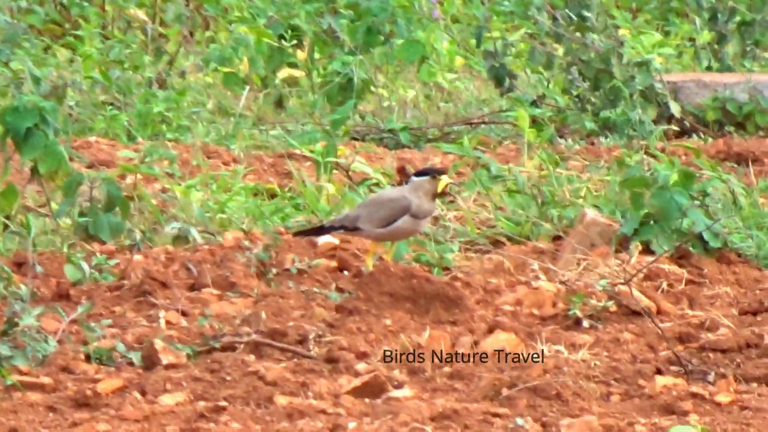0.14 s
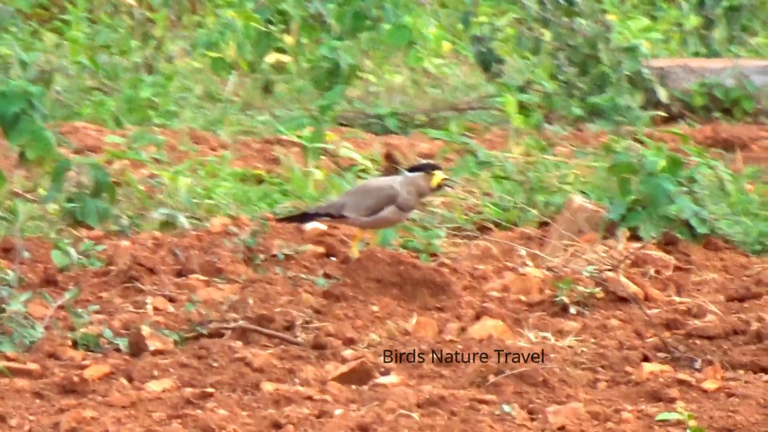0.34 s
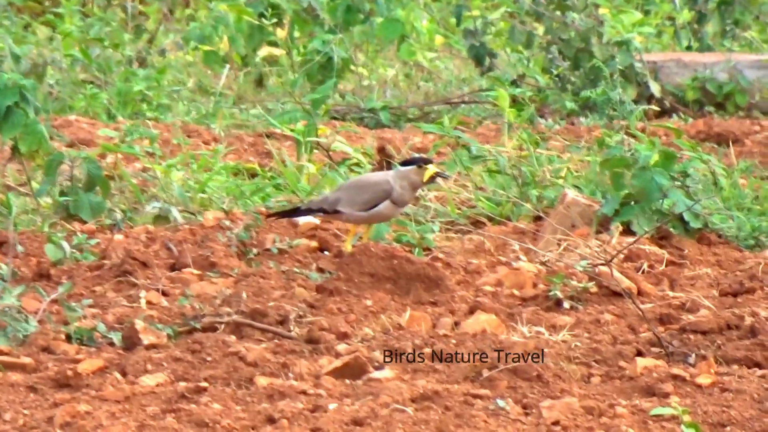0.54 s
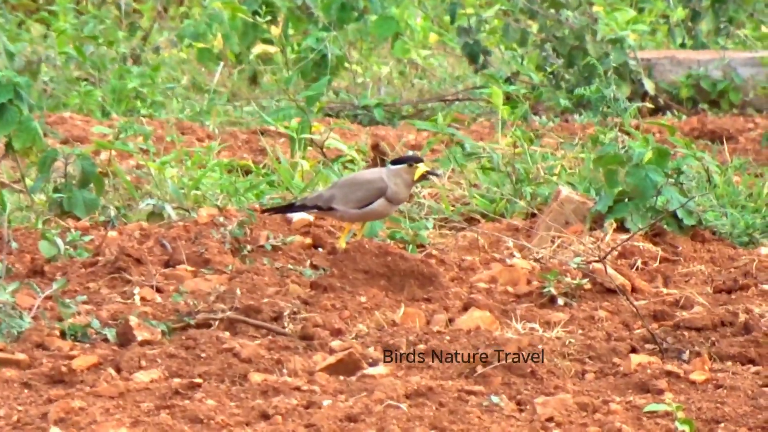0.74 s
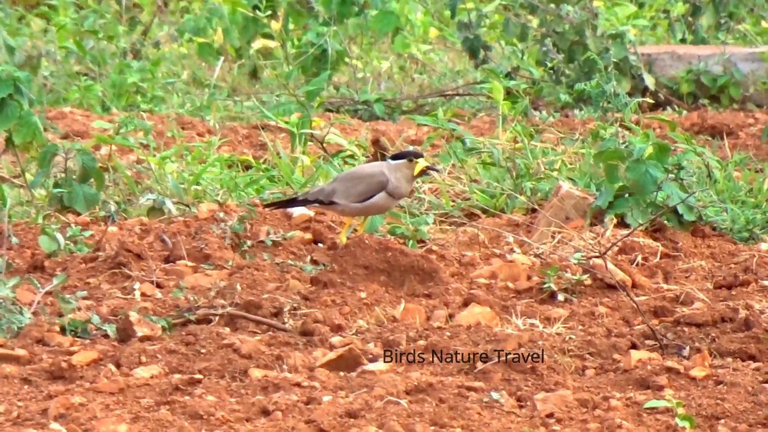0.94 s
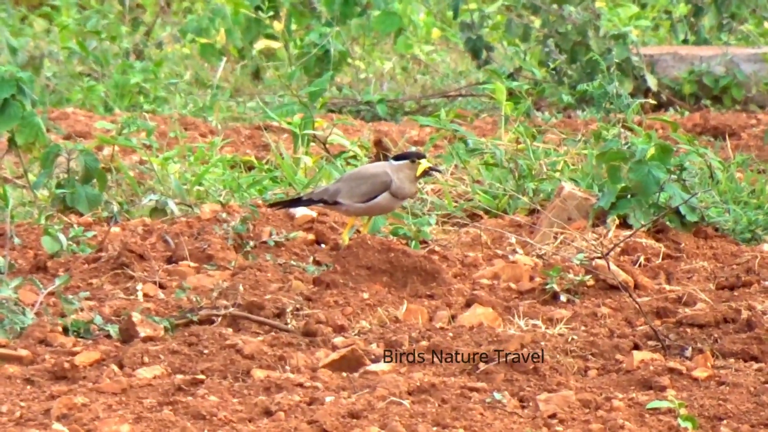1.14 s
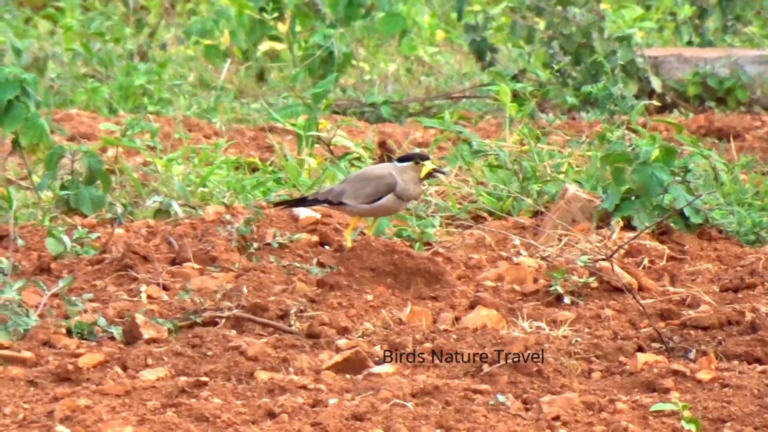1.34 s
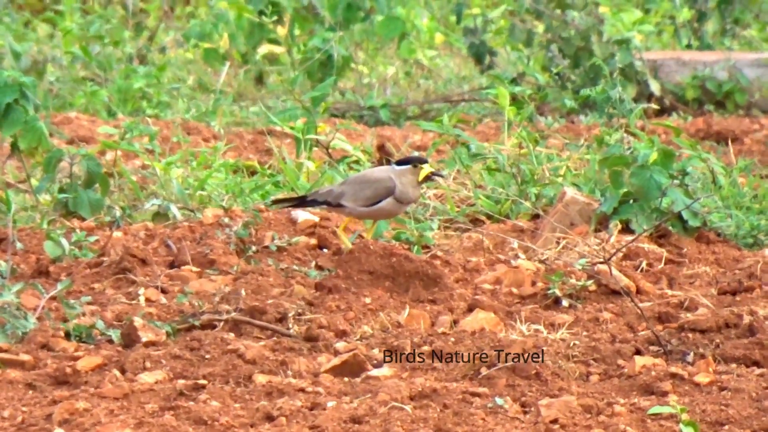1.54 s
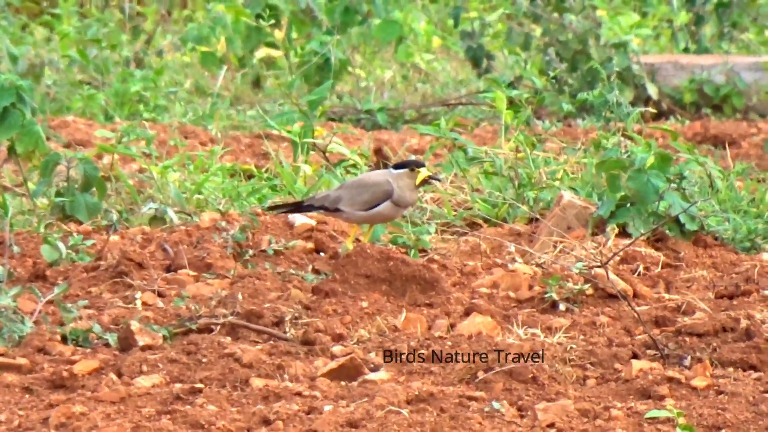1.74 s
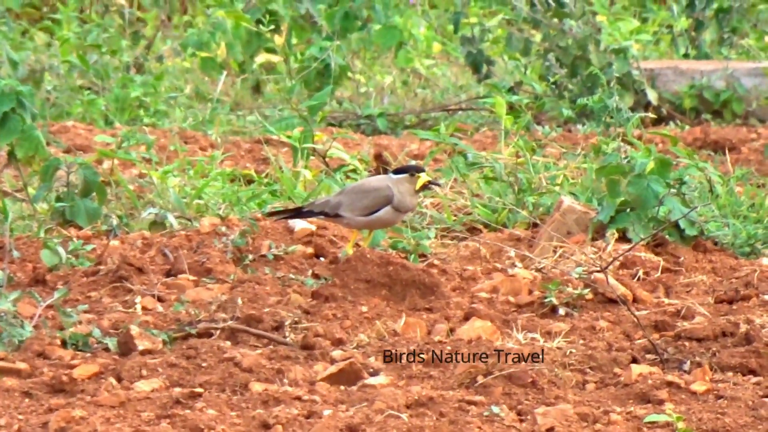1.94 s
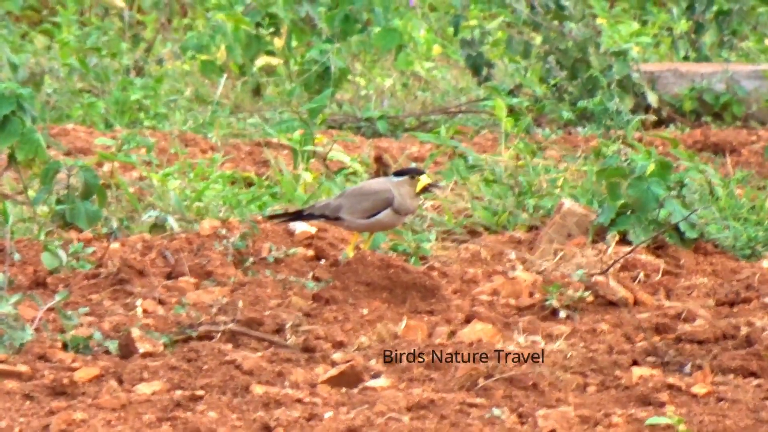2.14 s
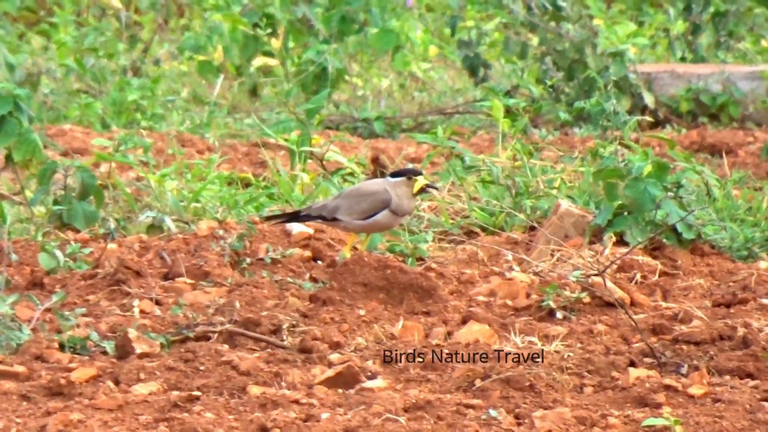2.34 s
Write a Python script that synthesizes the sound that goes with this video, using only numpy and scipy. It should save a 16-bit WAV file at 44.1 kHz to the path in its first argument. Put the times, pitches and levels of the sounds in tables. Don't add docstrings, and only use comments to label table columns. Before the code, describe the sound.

One bright, sharp bird whistle drops into a fluttering trill early on, echoing faintly off bushes. Afterwards come field hush, low hum, far traffic swells, sparse chirps and a late stone knock, through a small stereo microphone.

```python
import sys
import numpy as np
from scipy import signal
from scipy.fft import rfft, irfft
from scipy.io import wavfile
from scipy.ndimage import uniform_filter1d

SR = 44100
rng = np.random.default_rng(int(sys.argv[2]) if len(sys.argv) > 2 else 0)


def bounce(signal):
    frames = np.transpose(np.atleast_2d(signal))
    limited = np.clip(frames, -1, 1)
    pcm = np.round(limited * 32767).astype(np.int16)
    wavfile.write(sys.argv[1], SR, pcm)


def ratio(d):
    e = np.asarray(d, float) / 20
    return 10 ** e


N = 110250
T = np.arange(N) / SR


def at(hz, points):
    p = np.array(points, float)
    return np.interp(np.log(np.maximum(hz, 1)), np.log(p[:, 0]), p[:, 1])


def unit(x):
    return x / np.sqrt(np.mean(x ** 2))


def band(hz, width_hz):
    f = np.fft.rfftfreq(N, 1 / SR)
    bell = np.exp(-((f - hz) / width_hz) ** 2)
    return unit(irfft(rfft(rng.standard_normal(N)) * bell, N))


def walk(rate):
    hold = int(SR / rate)
    steps = np.repeat(rng.standard_normal(N // hold + 1), hold)
    return 1.194 * uniform_filter1d(uniform_filter1d(steps, hold), hold)[:N]


def ramp(start, length):
    return np.sin(np.pi / 2 * np.clip((T - start) / length, 0, 1)) ** 2


def pan(x, db):
    return np.array([x * ratio(db / 2), x * ratio(-db / 2)])


def fade(u, t60):
    return np.exp(-np.log(1000) * u / t60)


def field():
    # frequency in Hz, level in dB per Hz.
    colour = [(30, -114), (130, -98.5), (300, -82.5), (650, -74), (1100, -79), (2000, -86), (4500, -93),
              (11000, -105)]
    # frequency in Hz, side over mid in dB.
    side_db = [(60, -16), (300, -11.5), (620, -7.5), (1110, -4), (2000, -1), (6000, 1)]
    # frequency in Hz, left over right in dB.
    lean_db = [(100, 0.5), (350, -1), (620, -3), (2000, -5), (3500, 1), (11000, -1.5)]
    f = np.fft.rfftfreq(N, 1 / SR)
    mid, side = rfft(rng.standard_normal((2, N))) * ratio(at(f, colour))
    side = side * ratio(at(f, side_db))
    both = np.array([mid + side, mid - side]) * pan(np.ones(len(f)), at(f, lean_db))
    place = 3 * np.log2(np.maximum(f, 1) / 20)
    swell = walk(1.5)
    out = 0
    for k in range(31):
        share = np.cos(np.pi / 2 * np.clip(place - k, -1, 1)) ** 2
        out = out + irfft(both * share, N) * ratio(.25 * swell + .9 * walk(9.24))
    return out * ratio(-61.5) / np.sqrt(np.mean(out.mean(axis=0) ** 2))


def murmur():
    # centre in Hz, width in Hz, level in dB.
    blurs = [(1560, 345, -70), (3420, 230, -77), (3990, 1000, -79.5)]
    out = 0
    for hz, width_hz, db in blurs:
        out = out + np.array([band(hz, width_hz), band(hz, width_hz)]) * ratio(db + 2.0 * walk(7.5))
    return out


def pump():
    hum_hz = 394
    drift = 2.865 * walk(5.97)
    tone = np.sqrt(2) * np.sin(2 * np.pi * np.cumsum(hum_hz + drift) / SR) * ratio(-71.5)
    hum = tone + band(hum_hz, 18) * ratio(-75)
    return pan(hum * ratio(1.0 * walk(5.16)), -1.8)


def traffic():
    # start in seconds, length in seconds, centre in Hz, level in dB.
    swells = [
        (0.292, 0.14, 676, -63.5),
        (0.672, 0.15, 696, -75),
        (1.42, 0.28, 702, -61),
        (1.653, 0.2, 620, -62.5),
        (1.894, 0.17, 670, -64),
    ]
    out = 0
    for s, length, hz, db in swells:
        arch = np.sin(np.pi * np.clip((T - s) / length, 0, 1))
        out = out + band(hz, 140) * ratio(db) * arch
    return pan(out, -4.0)


def chirps():
    # start in seconds, length in seconds, from Hz, to Hz, level in dB.
    early = [(0.274, 0.043, 3600, 4030, -67.5), (0.301, 0.053, 4040, 3990, -62),
             (.355, 0.042, 3980, 3700, -64), (0.134, .035, 3930, 3960, -72), (.165, 0.043, 4140, 4270, -70),
             (0.613, 0.069, 5840, 5980, -65), (0.68, 0.045, 6850, 6140, -66.5),
             (0.719, 0.032, 6150, 6300, -72), (0.734, 0.061, 6320, 5280, -61.5),
             (0.789, 0.031, 5350, 4620, -59), (0.818, 0.016, 4820, 4350, -69),
             (0.748, 0.011, 5400, 4550, -59), (0.808, 0.022, 3660, 3970, -65),
             (0.826, 0.033, 3900, 3890, -63), (0.853, 0.088, 3890, 3630, -63),
             (0.864, 0.011, 3320, 3300, -61), (0.914, 0.014, 2570, 2500, -61),
             (0.925, 0.012, 2390, 2560, -55), (0.937, 0.011, 2600, 2590, -55.5),
             (0.944, 0.014, 2970, 3320, -57), (0.95, 0.027, 3330, 3340, -57.5),
             (0.964, 0.048, 3230, 3310, -73)]
    # start in seconds, length in seconds, from Hz, to Hz, level in dB.
    late = [(1.236, .14, 2145, 1970, -64.5), (1.715, 0.06, 4000, 3990, -67.5),
            (1.78, 0.041, 3980, 3990, -66), (1.818, 0.011, 3980, 3900, -59.5),
            (1.78, 0.016, 3080, 3220, -66), (1.798, 0.017, 3320, 3350, -63),
            (1.823, 0.0088, 3380, 3230, -64), (1.902, .04, 3930, 3980, -72),
            (2.092, 0.013, 4400, 3760, -65), (2.113, 0.016, 4420, 3950, -64),
            (2.134, 0.022, 3850, 4350, -56.5), (2.164, 0.053, 4900, 5560, -72),
            (2.248, 0.033, 3400, 3280, -67), (2.362, 0.0063, 4300, 4150, -66),
            (2.409, 0.0075, 3670, 4100, -63), (2.428, 0.012, 4630, 3930, -61),
            (2.436, .011, 4150, 4550, -65), (2.451, 0.014, 3970, 4180, -56.5),
            (2.461, 0.015, 4270, 4300, -63), (2.485, .008, 4220, 4400, -64),
            (2.483, 0.015, 4950, 5250, -69)]
    grain, wobble = walk(260), walk(130)
    out = 0
    for s, length, from_hz, to_hz, db in [*early, *late]:
        u = np.clip((T - s) / length, 0, 1)
        hz = (from_hz + (to_hz - from_hz) * u) * (1 + .008 * wobble)
        arch = np.sin(np.pi * u) ** .5
        tone = np.sin(2 * np.pi * np.cumsum(hz) / SR) * arch * ratio(db - 3 + 2 * grain)
        out = out + pan(tone, 2 + 3 * rng.standard_normal())
    return out


def clicks(events, modes):
    out = 0
    for s, db, slow, left_db in events:
        for hz, mode_db, t60, late in modes:
            u = np.maximum(T - s - late, 0)
            onset = 1 - np.exp(-u / 0.00025)
            ring = np.sin(2 * np.pi * hz * u) * fade(u, t60 * slow) * onset
            out = out + pan(ring * ratio(db + mode_db), left_db)
    out = signal.sosfilt(signal.butter(4, 420, "high", fs=SR, output="sos"), out)
    tail_s, crack_s = .1, .014
    u = T - events[0][0]
    tail = (u > 0) * fade(np.abs(u), tail_s)
    crack = ratio(-66) * tail ** (tail_s / crack_s) * band(7000, 2800)
    return out + crack + ratio(-57) * tail * np.array([band(2600, 1300), band(2600, 1300)])


def stone_tick():
    # time in seconds, level in dB, damping factor, left over right in dB.
    hits = [(.5271, -29.5, .8, 0)]
    # frequency in Hz, level in dB, 60 dB decay in seconds, lateness in seconds.
    modes = [(4200, -5, .005, 0), (3200, -2, .008, .0003), (2400, 0, .01, .0009), (1500, -10, .007, .0014),
             (880, -11, .014, .0016), (8000, -17, .005, 0), (6000, -17, .004, 0)]
    return clicks(hits, modes)


def stone_knocks():
    # time in seconds, level in dB, damping factor, left over right in dB.
    hits = [
        (2.3353, -43.5, 1.1, -2),
        (2.3425, -53, 1.0, -2),
    ]
    # frequency in Hz, level in dB, 60 dB decay in seconds, lateness in seconds.
    modes = [(956, 1.5, 0.027, 0.0027), (1910, -2.5, 0.023, 0.0016), (2426, -6, 0.05, 0.0022),
             (3280, 7, 0.0094, 0.00052), (4400, -9, 0.0074, 0.006), (1720, -2, 0.015, 0.01)]
    return clicks(hits, modes)


def grit_scuff():
    # time in seconds, level in dB, damping factor, left over right in dB.
    hits = [
        (2.481, -54, 1.0, -3),
        (2.4855, -55, 1.0, -3),
        (2.492, -57, 1.0, -3),
    ]
    # frequency in Hz, level in dB, 60 dB decay in seconds, lateness in seconds.
    modes = [(910, 1, .02, 0), (1610, 2, .02, 0), (2100, -1, .015, .001), (2570, 0, 0.016, .002),
             (5000, -10, .006, 0.011)]
    return clicks(hits, modes)


def lapwing():
    # time in seconds, pitch in Hz, effort in dB.
    contour = [
        (.2357, 1670, -5),
        (.241, 1772, -4),
        (.287, 1668, -1.5),
        (.36, 1648, 0),
        (.425, 1608, 0),
        (.447, 1572, -2),
        (.475, 1455, -1),
        (.51, 1364, 0),
        (.6, 1292, 0),
    ]
    # whistle level in dB, swell over the whistle in dB,
    # trill level in dB, swell over the trill in dB, left over right in dB.
    partials = [(-58.5, -9, -68.5, -5, -1.5), (-40.5, -0.5, -52, -5.5, 2.5), (-47.5, -8.5, -56, 8, 4),
                (-54.5, 3.5, -59.5, -1.5, 4.5), (-57, 0, -77.5, -18, 12), (-75.5, -9, -70, -5, 7),
                (-105, 4, -89, -4, 5), (-100, 0, -87, 5, 17)]
    s, hz, db = np.array(contour).T
    break_s, break_len_s, end_s = .453, .009, .6125
    attack_s, release_s, lead_s = .001, .003, .0023
    trill_hz, trill_peak_s = 103, .5642
    lift_s = .0027

    def smooth(v):
        return uniform_filter1d(np.interp(T, s, v), size=260)

    broke = ramp(break_s - break_len_s, 2 * break_len_s)
    whistle = np.clip((T - s[0]) / (break_s - s[0]), 0, 1) - .5
    trill = np.clip((T - break_s) / (end_s - break_s), 0, 1)

    since = T - trill_peak_s
    turn = trill_hz * since + 90 * np.maximum(since, 0) ** 2 + .015 * walk(40)
    place = turn - np.round(turn)
    slope = np.where(place < 0, .5, .3)
    tooth = ramp(.475, .04) * np.clip(1 - np.abs(place) / slope, 0, 1) ** 1.3
    throb = -18 * np.exp(-(((turn + .52 + .5) % 1 - .5) / .1) ** 2)

    lift = ramp(end_s - 2.6 * lift_s, lift_s)
    push = 3 * np.exp(-((T - 0.38) / 0.097) ** 2)
    rasp = broke * (1 - 0.55 * trill) * band(260, 90)
    pitch = smooth(hz) + 135 * lift + 95 * tooth * (1 - lift) + 8 * rasp + 1.5 * band(200, 150)
    phase = 2 * np.pi * np.cumsum(pitch) / SR

    joined = ramp(s[0] + lead_s - attack_s, 2 * attack_s)
    gate = ramp(s[0] - attack_s, attack_s) * (1 - ramp(end_s, release_s))
    effort = smooth(db)
    out = 0
    for k, (open_db, swell_db, shut_db, drift_db, left_db) in enumerate(partials, 1):
        size = (1 - broke) * ratio(open_db + swell_db * whistle)
        size = size + broke * ratio(shut_db + drift_db * (trill - .5))
        if k < 3:
            depth = 0.44 * trill ** 3
        elif k == 3:
            depth = trill ** 3
        else:
            depth = trill
        shake = push + 7 * lift * (min(k, 4) - 3)
        shake = shake + (5 * tooth * (k > 3) + throb * depth) * (1 - lift)
        shake = shake + .9 * broke * band(260, 200) + .25 * walk(57.2)
        shake = shake + 7 * (1 - joined) * (k == 4)
        entry = 1 if k in (3, 4) else joined
        wave = np.sqrt(2) * np.cos(k * phase + 0.26 * k ** 2)
        out = out + pan(size * ratio(effort + shake) * gate * entry * wave, left_db)
    return out


def bushes(sound):
    u = T[:SR] - .03
    scatter = rng.standard_normal(SR) + 0.067 * rng.standard_normal((2, SR))
    leaves = scatter * (u > 0) * fade(u, 1.1)
    leaves = leaves / np.sqrt(np.sum(leaves ** 2, axis=1, keepdims=True))
    return ratio(-24) * signal.fftconvolve(sound, leaves, axes=1)[:, :N]


def scene():
    background = field() + murmur() + pump() + traffic()
    far = chirps()
    near = stone_tick() + stone_knocks() + grit_scuff() + lapwing()
    return background + far + near + bushes(near + 2 * far)


def top_cut(x):
    return signal.sosfilt(signal.butter(12, 15700, fs=SR, output="sos"), x)


def record(dry):
    ghost_db = [-25, -31, -29]
    top_hz, ghost_step_hz, ghost_top_hz = 11100, 3900, 15700
    cut = signal.sosfilt(signal.ellip(6, .3, 25, top_hz, fs=SR, output="sos"), dry)
    f = np.fft.rfftfreq(N, 1 / SR)
    steep = rfft(cut) * (f / top_hz) ** 3 * (f < top_hz)
    ghosts = 0
    for m, db in enumerate(ghost_db, 1):
        ghosts = ghosts + np.roll(steep, int(m * ghost_step_hz * N / SR), axis=1) * ratio(db)
    return top_cut(cut + irfft(ghosts * (f < ghost_top_hz), N))


dry = scene()
out = record(dry)
bounce(out)
```